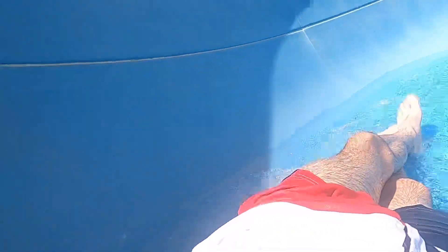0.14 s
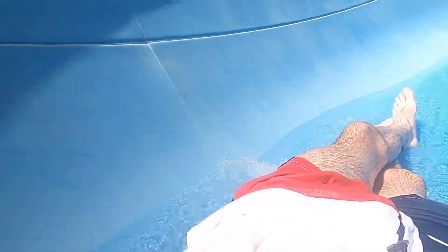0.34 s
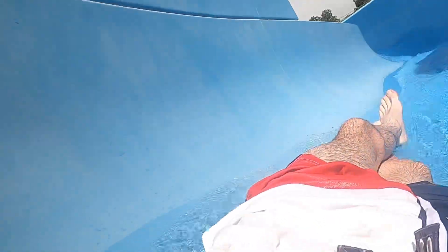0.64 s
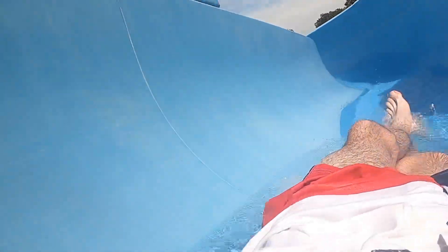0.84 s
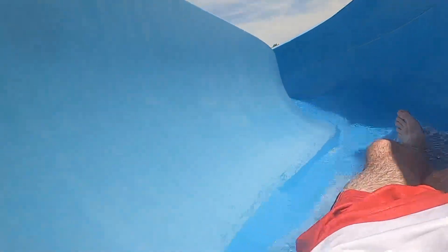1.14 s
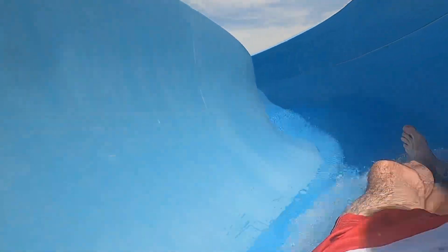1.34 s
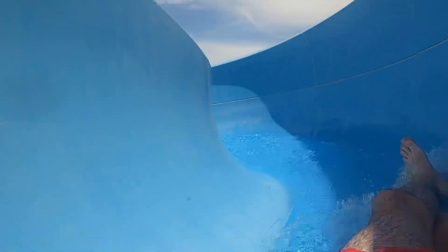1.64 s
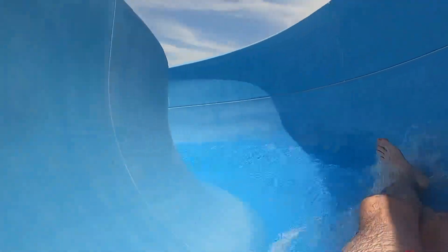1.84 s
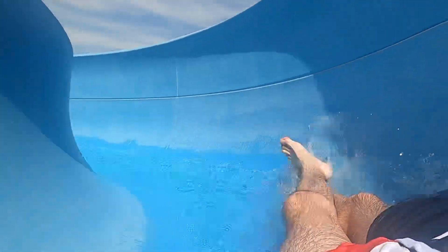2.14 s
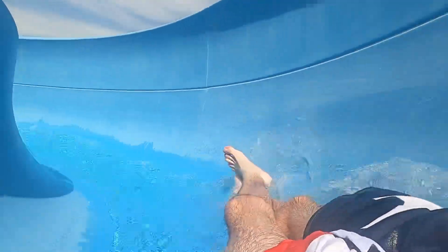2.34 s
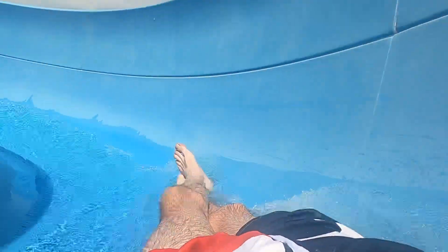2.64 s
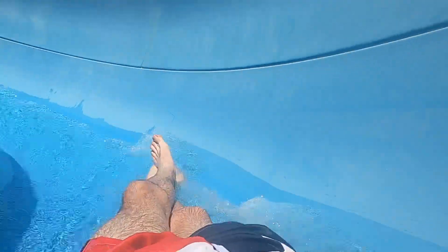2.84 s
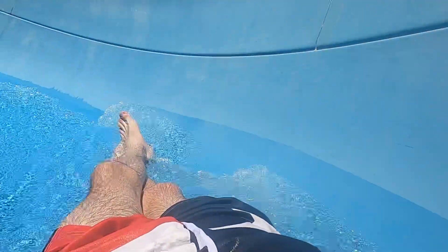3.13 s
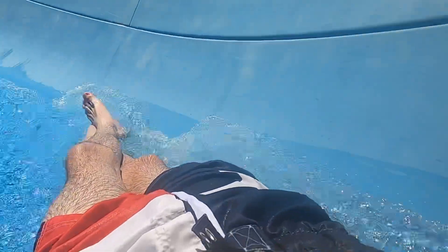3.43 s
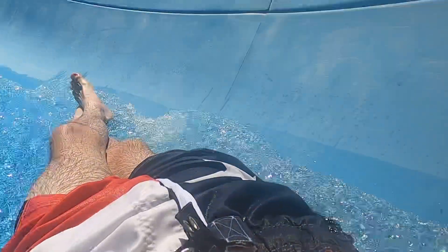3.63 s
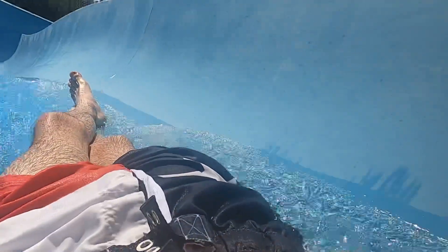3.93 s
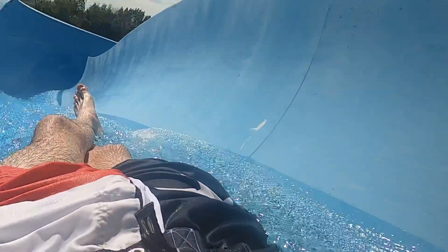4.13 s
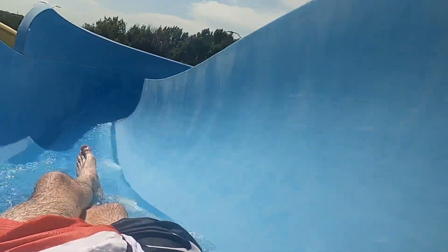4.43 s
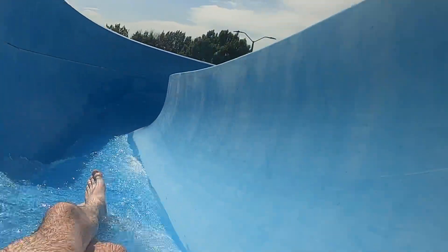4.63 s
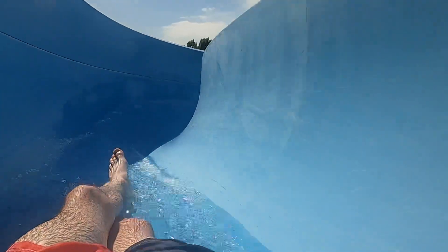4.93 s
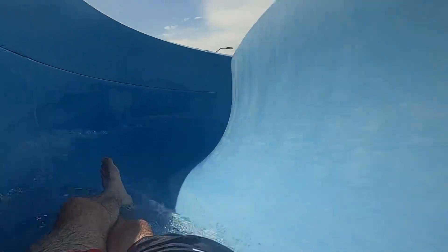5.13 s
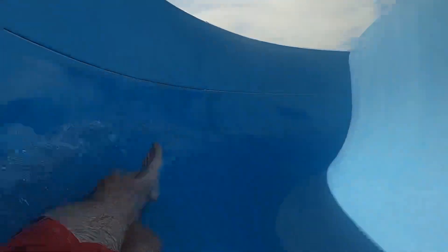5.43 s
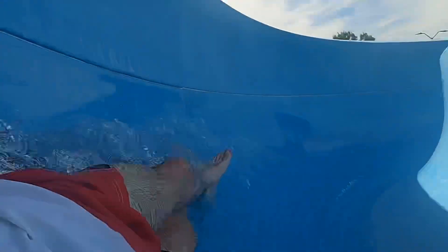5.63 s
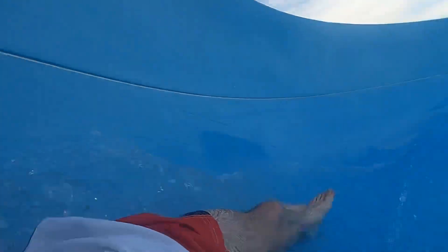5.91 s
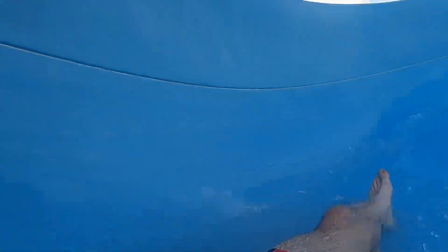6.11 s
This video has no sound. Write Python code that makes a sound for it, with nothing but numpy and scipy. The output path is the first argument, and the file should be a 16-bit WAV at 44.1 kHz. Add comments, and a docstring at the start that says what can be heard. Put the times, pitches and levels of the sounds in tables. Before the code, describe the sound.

Water rushes and drums hollowly on a waterproof camera case sliding down a flume, with deep lurching rumbles, slaps and hard joint knocks late on.

```python
"""Ride down a water slide

Rushing water drums on a waterproof camera case, a resonator near 1 kHz excited by dense random impacts.
Spray, as filtered noise and spatter, fizzes at two microphone ports; slaps, drops and bubbles stand out.
The ride rumbles in low noise bands and lurches as short low-pitched swings.
Flume joints strike damped modes of the mount, and the rider's body thumps just after.
Peaks above a ceiling drive the camera's gain down at once, and the sound swells back slowly."""
import sys
import numpy as np
from scipy import signal
from scipy.fft import rfft, irfft
from scipy.io import wavfile
from scipy.ndimage import uniform_filter1d, minimum_filter1d

SR = 44100
rng = np.random.default_rng(int(sys.argv[2]) if len(sys.argv) > 2 else 0)


def digitize_waveform(pressure):
    """Quantize a signal to 16-bit integers and store it at the path in sys.argv[1].

    Rows of a 2-D input are taken as channels; values are limited to [-1, 1].
    """
    field = np.atleast_2d(pressure).T
    bounded = np.clip(field, -1, 1)
    quanta = np.round(bounded * 32767).astype(np.int16)
    wavfile.write(sys.argv[1], SR, quanta)


N = 276507
TIME = np.arange(N) / SR  # s
FREQ = np.fft.rfftfreq(N, 1 / SR)  # Hz

# shaking of the ride: (time [s], relative sway level [dB], relative judder level [dB])
RIDE_SHAKING = [(0, -35, -31.5), (.35, -25.5, -40.5), (.85, -25.5, -34.5), (1.15, -20, -26),
                (1.5, -30, -33.5), (1.95, -31, -40), (2.25, -21.5, -39.5), (2.7, -30, -41),
                (3, -22.5, -39.5), (3.6, -27, -38.5), (3.82, -25, -27), (4.05, -31.5, -47.5),
                (4.6, -30.5, -39.5), (5.4, -24, -38.5), (5.95, -28.5, -49.5), (6.27, -22, -31)]
# lurches that swing the camera: (time [s], relative peak level [dB], frequency [Hz])
LURCHES = [(0.062, -12.5, 58), (0.168, -12, 47), (0.662, -13.5, 32), (0.747, -14, 59), (.811, -14, 66),
           (1.125, -10, 40), (1.205, -12.5, 100), (1.696, -9.5, 42), (2.164, -9, 38), (2.417, -8.5, 30),
           (2.931, -8.5, 35), (3.411, -13.5, 78), (3.804, -9, 80), (3.83, -10, 78.7), (4.32, -12.5, 56),
           (4.822, -14.5, 69), (5.198, -10.5, 47), (5.581, -8.5, 55), (6.241, -16, 47)]
# flume joints: (time [s], relative knock level [dB], relative level of the body's thump [dB])
JOINTS = [(0.5974, -12, -6), (1.349, -13.5, -14), (3.8789, -4, 4), (4.3376, 7.5, 4), (5.1501, 1.5, -0.5)]
# modes of the camera mount: (frequency [Hz], relative level [dB], 60 dB decay time [s], left-right level [dB])
MOUNT_MODES = [(202, 5, .017, 0), (301, 5.5, 0.016, 0.5), (438, -6.5, 0.007, 14)]
# largest drops and spurts at the ports:
# (time [s], relative level [dB], bubble pitch [Hz], left-right level of the bubble [dB], spatter decay [s])
DROPS = [(0.375, -45, 5350, -4.5, .003), (.952, -33, 5100, -14, 0.0021), (1.2254, -32.5, 4920, 0, 0.0024),
         (1.469, -31.5, 3000, 16, 0.0017), (1.518, -35, 5150, -3, .001), (2.88, -32.5, 4780, -7, .0027),
         (3.567, -36.5, 3900, 2, 0.00071), (4.913, -39, 5000, -28, 0.00056), (5.441, -34, 4550, -4, .001),
         (5.466, -33.5, 5170, -14, 0.0016), (5.527, -32.5, 3780, 3, 0.0009), (5.549, -29, 5020, -17, .016),
         (5.647, -31, 4870, -3, .003), (5.671, -38, 5200, -7, 0.0046), (5.944, -31.5, 4120, -3, 0.0013)]
# large gulps and bubbles: (time [s], peak level before panning [dB], pitch [Hz], pitch glide [octaves/s])
LARGE_BUBBLES = [(0.753, -33.5, 302, 6), (.94, -34, 323, 8), (0.996, -26, 250, -12), (1.054, -30.5, 398, 7),
                 (1.208, -31.5, 231, -1), (1.264, -35, 243, -5), (1.568, -32, 212, -2),
                 (2.068, -32, 1590, 3), (3.012, -34.5, 1213, 22.5), (3.765, -34.5, 670, 0)]
# hardest slaps of water on the case: (time [s], relative peak level [dB], pitch [Hz])
HARD_SLAPS = [(.057, -21.5, 1065), (.119, -21, 1070), (0.376, -20.5, 1030), (.507, -19.5, 1100),
              (1.002, -19, 1064), (1.275, -21, 1050), (1.716, -23.5, 1000), (2.034, -14, 1063),
              (2.058, -21, 1126), (2.095, -17, 1070), (2.269, -18, 1030), (2.851, -21, 1055),
              (3.01, -15, 1080), (3.195, -20, 1106), (3.681, -24, 1000), (3.836, -23.5, 1110),
              (4.93, -20.5, 1090), (5.041, -16, 1090), (5.331, -24, 1050), (5.548, -12.5, 1020),
              (5.769, -20.5, 1170)]
# strength of the water rushing past the case: (time [s], level above usual [dB])
FLOW = [(0, -2), (.78, -2), (.9, 0), (.98, 4), (1.25, 3), (1.6, -0.2), (1.95, 0), (2.1, 4), (2.55, -1),
        (3.15, 0.8), (3.75, -0.5), (4.55, -1.5), (5.05, 2.5), (5.35, -.5), (5.5, 2.5), (5.57, 7), (5.82, 2),
        (6.27, 3)]
# strength of the water drumming on the case: (time [s], level above usual [dB])
DRUMMING = [(0, -8), (.15, .5), (.3, -3.5), (.55, 0.5), (.8, -3.5), (1, 1.5), (1.33, 3), (1.55, 1.5),
            (2.15, 1.5), (2.38, 1), (2.55, -2), (3.15, -0.5), (3.55, -1), (3.78, 2.5), (4.2, 0), (5.4, 1.5),
            (5.58, 5), (6.27, -1.5)]
# fineness of the spray: (time [s], gain of its treble over its lower part [dB])
FINENESS = [(0, -2.5), (.7, -3.5), (1.2, -2.5), (2, -5), (3.8, -4.5), (4.3, -2.5), (5.2, -4), (5.6, 0.5),
            (6.27, -1.5)]
# waves heaping up against the case: (start [s], length [s], swell of the slosh [dB])
WAVES = [(.93, 0.14, 5), (1.19, .2, 0.5), (3.65, .2, 1.5), (6.19, .08, 1.5)]

# spectral colour of each layer: (frequency [Hz], gain [dB])
SWAY_COLOUR = [(5, 0.5), (18, -10), (32, 2), (50, -8), (75, -14.5), (150, -53.5), (400, -92)]
JUDDER_COLOUR = [(25, -29), (55, -5), (80, 1.5), (110, -6), (150, -15), (300, -25), (800, -82)]
SLOSH_COLOUR = [(60, -13.5), (170, -8), (300, -2.5), (430, 0), (600, -3.5), (800, -9), (1300, -6),
                (3000, -69.5)]
WASH_COLOUR = [(400, -30), (800, -9), (1350, -5.5), (1620, 3.5), (1850, -3), (2100, -28.5), (2500, -14.5),
               (4000, -49.5)]
FIZZ_COLOUR = [(3000, -18.5), (6500, 9), (8600, -13), (9400, 5.5), (10500, -10.5), (11800, -7.5),
               (12600, -21), (14000, -40.5)]
# response of each microphone port: (frequency [Hz], gain [dB])
LEFT_PORT = [(1000, -6.5), (2050, -4), (2450, 2), (2750, -2.5), (2980, 3.5), (3300, -4), (3750, -5),
             (4050, -3), (4600, -7.5), (5200, -12.5), (6000, -20), (6600, -17), (7800, -19), (8700, -36)]
RIGHT_PORT = [(1000, -27), (1900, -2.5), (2500, -12.5), (3000, -7.5), (3400, -9.5), (4000, -8), (4500, -1),
              (4800, -2.5), (5130, 2.5), (5650, -4.5), (6300, -12.5), (7300, -24), (8000, -48), (9000, -38)]
# likeness of the two ports: (frequency [Hz], shared share of the amplitude [0 to 1])
PORT_LIKENESS = [(1300, 0.52), (2000, 0.44), (2300, 0.36), (2700, .5), (3000, .88), (3400, 0.61),
                 (4000, 0.67), (4400, 0.61), (4750, 0.27), (5300, 0.25), (6500, 0.46), (8000, .15)]
# phase between the ports: (frequency [Hz], lead of the left port [rad])
LEFT_LEAD = [(0, 0), (300, 0), (520, .5), (750, 0), (1300, 0), (1700, -.4), (2150, -2), (2500, -1.9),
             (2800, -.5), (3800, -.6), (4400, -4.2), (4750, -2.3), (5300, -3.8), (6500, -1)]

CASE_HZ, CASE_WIDTH_HZ = 1067.8, 197  # hollow ring of the case; width of each of its two poles
BODY_HZ, BODY_T60_S = 74.7, 0.051  # the rider's body on the flume
LURCH_RISE_CYCLES, LURCH_FALL_CYCLES = 0.82, 0.97
CONTACT_DB, CONTACT_DECAY_S = -29.5, 0.0015  # click of a joint, relative to its knock
CASE_KNOCK_DB = -35  # ring of the case, relative to the knock
SMALL_SLAPS_PER_S, SMALL_SLAP_DB = 14, -28.5  # upper bound of their level, on the scale of HARD_SLAPS
LARGE_BUBBLE_RING_S = 0.0044  # time to peak, and scale of the decay
WAVE_RISE_S, WAVE_FALL_S = 0.035, 0.22
# base level of each water layer, before flow, panning and tilt [dB]
SLOSH_DB, RING_DB, WASH_DB, GURGLE_DB = -48, -38, -52.5, -56
SPRAY_DB, MIST_DB, SPATTER_DB = -47, -78.5, -63.5
DROPLET_DB, LAP_DB = -62.5, -57  # stray droplets; flapping pockets of air
DROPLET_SIDE_DB = -4.5  # left-right level
SLOSH_GROWTH, WASH_GROWTH, MIST_GROWTH = 0.45, 1, 1.6  # dB per dB of flow
CEILING_DB, RECOVERY_DB_PER_S = -2.5, 7.5  # gain control of the camera
EDGE_HZ = 14000  # band limit of the camera


def amp(db):
    """Level as a logarithm of amplitude: decibels to gain."""
    return 10 ** (np.asarray(db) / 20)


def unit(x):
    """Normalisation by mean power: scales to rms 1."""
    return x / np.sqrt(np.mean(x ** 2) + 1e-20)


def read(points, hz):
    """Spectral interpolation on a logarithmic frequency axis."""
    f, value = np.transpose(points)
    return np.interp(np.log(hz + 1), np.log(np.abs(f) + 1), value)


def curves(rows):
    """Linear interpolation in time of each column of a control table."""
    s, *columns = np.transpose(rows)
    return [np.interp(TIME, s, column) for column in columns]


def colour(x, points):
    """Linear filtering: the spectrum is multiplied by tabulated gains."""
    return irfft(rfft(x) * amp(read(points, FREQ)), N)


def pan(db):
    """Level-difference stereo: half the difference is given to each channel, in opposite senses."""
    return amp([[db / 2], [-db / 2]])


def add(mix, s, sound):
    """Superposition: lays a sound into the mix at a time [s]."""
    start = max(round(s * SR), 0)
    part = mix[..., start:][..., :sound.shape[-1]]
    part += sound[..., :part.shape[-1]]


def wander(rate_hz):
    """Low-passed noise: a smooth random curve of rms 1, up to about the given rate."""
    return unit(irfft(rfft(rng.standard_normal(N)) / (1 + (FREQ / rate_hz) ** 4), N))


def resonate(x, hz, width):
    """Resonance by frequency shifting: two equal poles, gain 1 at a centre that may follow a curve."""
    turn = np.exp(2j * np.pi * np.cumsum(hz * np.ones(N)) / SR)
    r = np.exp(-np.pi * width / SR)
    shifted = x / turn + 1e-18
    return 2 * (turn * signal.lfilter([(1 - r) ** 2], [1, -2 * r, r * r], shifted)).real


def patter(per_s, spread_db):
    """Shot noise: random impacts, most of them small and a few large, of rms 1."""
    size = amp(spread_db * np.minimum(rng.exponential(1, N), 4))
    sign = rng.choice([-1, 1], N)
    return unit(size * sign * (rng.random(N) < per_s / SR))


def patchy(x, depth_db):
    """Time-frequency modulation: random patches some 20 ms long and 500 Hz wide."""
    z = signal.stft(x, nperseg=256)[2]
    field = uniform_filter1d(rng.standard_normal(z.shape), size=3, axis=-2)
    field = uniform_filter1d(field, size=7, axis=-1)
    return signal.istft(z * amp(depth_db * unit(field)))[1][..., :N]


def ports(a, b):
    """Partial coherence: two partly alike signals pass differently tuned microphone ports."""
    same = np.clip(read(PORT_LIKENESS, FREQ), 0, 1)
    right = same * rfft(a) + np.sqrt(1 - same ** 2) * rfft(b)
    right = right * np.exp(-1j * read(LEFT_LEAD, FREQ))
    return np.array([colour(a, LEFT_PORT), colour(irfft(right, N), RIGHT_PORT)])


def tilt(x, db, pivot_hz=3800):
    """Complementary band splitting: a curve [dB] raises the treble and lowers the rest."""
    low = irfft(rfft(x) / (1 + (FREQ / pivot_hz) ** 6), N)
    return low * amp(-db / 2) + (x - low) * amp(db / 2)


def bubble(hz, ring_s, rise):
    """Volume resonance of an air pocket: swells to an envelope peak of 1 and glides by rise [octaves/s]."""
    t = np.arange(0, 7 * ring_s, 1 / SR)
    envelope = t / ring_s * np.exp(1 - t / ring_s)
    return envelope * np.sin(2 * np.pi * np.cumsum(hz * 2 ** (rise * t)) / SR)


def gurgle(low_hz, high_hz, per_s, cycles, rise, count=20):
    """Superposed bubble resonances: a random swarm of many pitches and sizes, rms 1."""
    kinds = [bubble(hz, cycles / hz, rise * rng.uniform(-0.25, 3.9))
             for hz in np.geomspace(low_hz, high_hz, count)]
    out = np.zeros(N)
    for when, kind, size in rng.random((int(per_s * N / SR), 3)):
        add(out, when * N / SR, amp(14 * size) * kinds[int(kind * count)])
    return unit(out)


def rumble():
    """Low-frequency vibration: noise bands for sway and judder, and lurches that swing out in a cycle or two."""
    sway_db, judder_db = curves(RIDE_SHAKING)
    out = amp(sway_db + 1.2) * unit(colour(rng.standard_normal(N), SWAY_COLOUR))
    out += amp(judder_db + 2.7) * unit(colour(rng.standard_normal(N), JUDDER_COLOUR))
    for s, db, hz in LURCHES:
        cycles = (TIME - s) * hz
        width = np.where(cycles < 0, LURCH_RISE_CYCLES, LURCH_FALL_CYCLES)
        envelope = np.exp(-np.minimum((cycles / width) ** 2, 20))
        out -= amp(db + 0.2) * envelope * np.cos(2 * np.pi * cycles)
    return out * pan(.8)


def knocks(soft_hz=640, lag_s=0.0016, case_ring_s=.0015):
    """Modal excitation: a joint clicks and strikes the mount and case; the rider's body thumps just after."""
    t = np.arange(SR // 5) / SR
    out, clicks, case = np.zeros((2, N)), np.zeros((2, N)), np.zeros(N)
    ring = -sum(amp(level - 60 * t / t60) * np.sin(2 * np.pi * hz * t) * pan(side_db)
                for hz, level, t60, side_db in MOUNT_MODES)
    ring *= 1 - np.exp(-t / 0.0022)  # the padding takes a moment to pass the blow on
    thump = amp(-60 * t / BODY_T60_S) * np.sin(2 * np.pi * BODY_HZ * t)
    thump *= 1 - np.exp(-t / 0.0038)  # gradual onset
    for s, knock_db, thump_db in JOINTS:
        add(out, s - .0008, amp(knock_db) * ring / np.abs(ring).max())
        add(out, s + lag_s, amp(thump_db - 0.5) * thump / np.abs(thump).max() * pan(.6))
        click = np.exp(-t / CONTACT_DECAY_S) * rng.standard_normal((2, len(t)))
        add(clicks, s, amp(knock_db + CONTACT_DB) * click)
        add(case, s - case_ring_s, amp(knock_db + CASE_KNOCK_DB) * bubble(CASE_HZ, case_ring_s, 0))
    padded = signal.sosfilt(signal.butter(6, soft_hz, fs=SR, output="sos"), out)
    return padded + ports(*clicks) + case * pan(3)


def drops(ring_s=0.0013):
    """Drop impact: a decaying noise spatter on the case, and the resonance of a tiny bubble."""
    t = np.arange(SR // 12) / SR
    pings, spatter = np.zeros((2, N)), np.zeros((2, N))
    for s, db, hz, side_db, decay_s in DROPS:
        add(pings, s, amp(db - 4.5) * bubble(hz, ring_s, 6.7) * pan(side_db))
        add(spatter, s, amp(db) * np.exp(-t / decay_s) * rng.standard_normal((2, len(t))))
    return pings + amp(11) * ports(*spatter) + amp(-32.0) * colour(spatter, FIZZ_COLOUR)


def gulps():
    """Volume resonance of the few bubbles large enough to stand out of the churn."""
    out = np.zeros(N)
    for s, db, hz, rise in LARGE_BUBBLES:
        add(out, s, amp(db) * bubble(hz, LARGE_BUBBLE_RING_S, rise))
    return out * pan(1.8)


def slaps(ring_s=0.003, splash_s=0.0016, detune=.1):
    """Trapped-air resonance: water slaps ring near the case's pitch and burst into a short noise splash."""
    t = np.arange(SR // 20) / SR
    ring, splash = np.zeros(N), np.zeros((2, N))
    # lighter slaps fall at random among the hard ones
    draws = rng.random((int(SMALL_SLAPS_PER_S * N / SR), 3))
    small = [(when * N / SR, SMALL_SLAP_DB - 6 * size, CASE_HZ * (1 + detune * (2 * pitch - 1)))
             for when, size, pitch in draws]
    for s, db, hz in HARD_SLAPS + small:
        add(ring, s - .0005, amp(db - 7.5) * bubble(hz, ring_s, 0.89))
        add(splash, s, amp(db - 22.5) * np.exp(-t / splash_s) * rng.standard_normal((2, len(t))))
    return ring * pan(2.0) + ports(*splash)


def waves():
    """Additive level modulation [dB]: each wave heaps up quickly, holds and drains away."""
    swell_db = 0
    for s, length, db in WAVES:
        rise = np.clip((TIME - s) / WAVE_RISE_S, 0, 1)
        drain = np.exp(-np.maximum(TIME - s - length, 0) / WAVE_FALL_S)
        swell_db = swell_db + db * rise * drain
    return swell_db


def spray(flow_db, surge, spatter_s=0.0014):
    """Filtered shot noise: foam, small spatters and fine mist at the two ports."""
    fine_db, = curves(FINENESS)
    # foam is a dense patter and noise with fewer, separate droplets on top
    foam = [patter(5000, 3.8) + 0.87 * rng.standard_normal(N) + amp(-3.5) * patter(140, 1.8)
            for _ in range(2)]
    hiss = unit(patchy(ports(*foam), depth_db=2.5) * amp(0.98 * surge)) * amp(SPRAY_DB + flow_db)
    # a spatter is a burst of noise that dies away in a few ms
    clumps = signal.lfilter([1], [1, -np.exp(-1 / (spatter_s * SR))], np.abs(patter(27, 4.5)))
    bursts = ports(*(clumps * rng.standard_normal((2, N))))
    spatter = unit(patchy(bursts, depth_db=6)) * amp(SPATTER_DB + flow_db)
    # the mist grows faster than the flow
    mist = unit(colour(np.array([patter(700, 5.1) for _ in range(2)]), FIZZ_COLOUR))
    mist = patchy(mist, depth_db=5.5) * amp(MIST_DB + MIST_GROWTH * flow_db + fine_db / 2)
    return tilt(hiss + spatter, fine_db) + mist


def churn(flow_db, surge):
    """Random excitation of resonators: a low slosh, the ringing case, a wash and a swarm of bubbles."""
    slosh = unit(colour(patter(2500, 4.2), SLOSH_COLOUR))
    slosh *= amp(SLOSH_DB + SLOSH_GROWTH * flow_db + waves() + 1.2 * surge)
    drum = unit(patter(4000, 2.1) + rng.standard_normal(N)) * amp(0.92 * surge + 2 * wander(22))
    # the water's weight on the case bends its pitch a little
    ring = unit(resonate(drum, CASE_HZ + 30 * wander(18), CASE_WIDTH_HZ))
    ring *= amp(RING_DB + curves(DRUMMING)[0])
    wash = unit(colour(patter(3000, 2.3) * amp(1.4 * surge), WASH_COLOUR))
    wash *= amp(WASH_DB + WASH_GROWTH * flow_db)
    bubbles = gurgle(900, 1900, per_s=70, cycles=4, rise=9) * amp(GURGLE_DB + WASH_GROWTH * flow_db)
    return slosh * pan(1.9) + ring * pan(3.65) + wash * pan(1.8) + bubbles * pan(3)


def water():
    """Common modulation: churn and spray share flow and surge; droplets tick and air pockets flap."""
    flow_db, = curves(FLOW)
    surge = wander(60)
    rush = churn(flow_db, surge) + spray(flow_db, surge)
    droplets = gurgle(2300, 5700, per_s=45, cycles=2, rise=8) * amp(DROPLET_DB + flow_db)
    laps = gurgle(170, 520, per_s=40, cycles=.7, rise=4)
    laps *= amp(LAP_DB + SLOSH_GROWTH * flow_db + waves())
    return rush + droplets * pan(DROPLET_SIDE_DB) + laps * pan(2)


def scene():
    """Superposition of all that reaches the two ports."""
    return rumble() + knocks() + drops() + gulps() + slaps() + water()


def record(dry):
    """Peak limiting with slow linear recovery in decibels, then the low-pass band limit of the camera."""
    over_db = np.maximum(20 * np.log10(np.abs(dry).max(0) + 1e-9) - CEILING_DB, 0)
    recovered = RECOVERY_DB_PER_S * TIME
    gain = amp(recovered - np.maximum.accumulate(over_db + recovered))
    # the drop is smoothed over 61 samples
    gain = uniform_filter1d(minimum_filter1d(gain, size=61), size=61)
    low_pass = signal.firwin(511, EDGE_HZ, window=("kaiser", 9), fs=SR)
    return signal.oaconvolve(dry * gain, low_pass[None], "same")


dry = scene()
out = record(dry)
digitize_waveform(out)
```